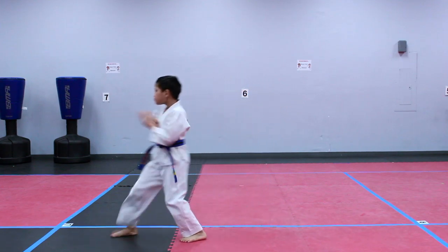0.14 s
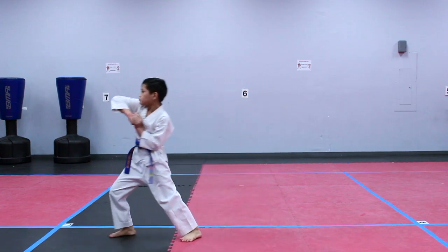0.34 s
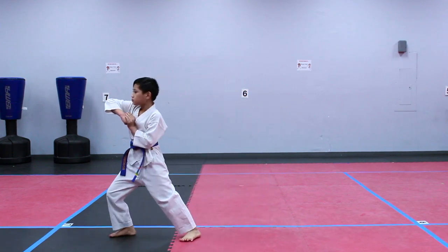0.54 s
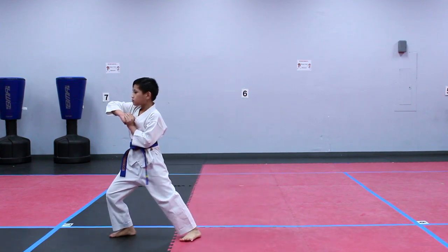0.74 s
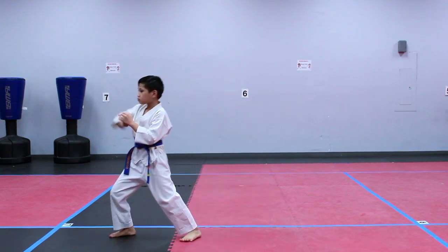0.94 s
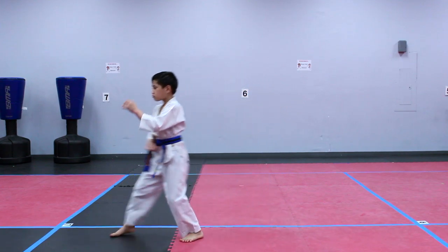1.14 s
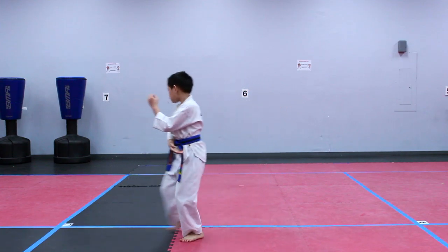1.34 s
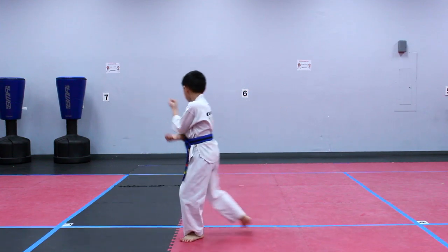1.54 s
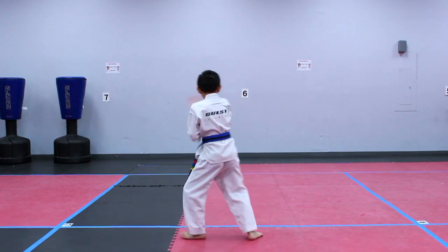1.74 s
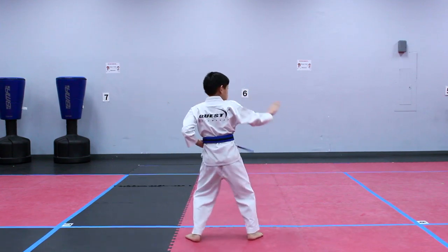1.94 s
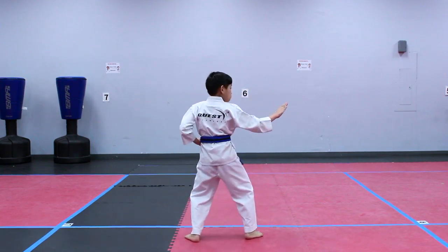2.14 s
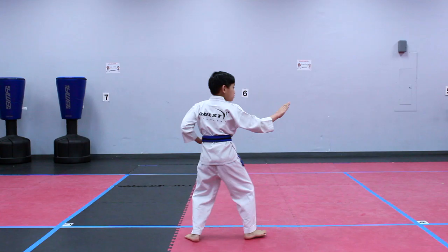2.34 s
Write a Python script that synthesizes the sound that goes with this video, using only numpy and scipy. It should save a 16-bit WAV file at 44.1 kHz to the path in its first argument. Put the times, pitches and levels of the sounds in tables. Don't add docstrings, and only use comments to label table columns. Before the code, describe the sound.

A sharp smack of elbow on palm with a bright cotton snap comes almost at once and rings through a quiet hall; later come faint cloth ticks, a soft barefoot step and slide on a foam mat, heard a few steps away.

```python
import sys
import numpy as np
from scipy import signal
from scipy.fft import rfft, irfft
from scipy.io import wavfile
from scipy.ndimage import uniform_filter1d

SR = 44100
rng = np.random.default_rng(int(sys.argv[2]) if len(sys.argv) > 2 else 0)


def attenuation_scalar(level_db):
    decades = np.asarray(level_db, float) / 20
    return 10 ** decades


def log_audio(samples):
    frames = np.atleast_2d(samples).T
    limited = np.clip(frames, -1, 1)
    pcm = np.round(limited * 32767).astype(np.int16)
    wavfile.write(sys.argv[1], SR, pcm)


N = 105840


def crack(level_db, ring_hz, width_hz, chance):
    edge_db, fizz_db, fizz_s = -3, -16, 0.002
    t = np.arange(len(chance)) / SR
    decay = np.pi * width_hz * t
    ring = -np.e * decay * np.exp(-decay) * np.sin(2 * np.pi * ring_hz * t)
    ring[2] -= attenuation_scalar(edge_db)
    radius = np.exp(-np.pi * width_hz / SR)
    resonance = [1, -2 * radius * np.cos(2 * np.pi * ring_hz / SR), radius ** 2]
    fizz = evened(signal.lfilter([1, 0, -1], resonance, chance))
    return attenuation_scalar(level_db) * (ring + attenuation_scalar(fizz_db) * fizz * np.exp(-t / fizz_s))


# [start_s, level_db (peak), ring_hz, width_hz, near_echo_db]
CLOTH_CRACKS = [(.2058, -32, 5500, 5000, -6), (.2117, -25, 4500, 5000, -6), (.2169, -3, 6600, 2500, 1.5),
                (.2195, -12, 3500, 4000, -6), (.2227, -8, 5000, 2500, -9), (.2253, -12, 7500, 3500, -8),
                (.33, -33, 4800, 1200, -6), (1.1906, -25, 5800, 2000, -6), (1.2323, -38, 7200, 2500, -3),
                (1.2447, -31, 6300, 2500, 4), (1.2456, -33, 3300, 1600, 1.5), (1.27, -35, 7000, 4000, -5),
                (1.2868, -33, 6200, 2000, -6), (1.6913, -38, 6000, 5000, -4),
                (1.6982, -32, 4800, 3000, -.7), (1.7483, -37, 7000, 3500, -4), (1.758, -33, 7000, 2500, -6),
                (2.108, -36, 6800, 3500, 4)]


def cloth_cracks():
    layers = np.zeros((3, 2, N))
    chances = rng.standard_normal((len(CLOTH_CRACKS), 512))
    for k, (start_s, level_db, ring_hz, width_hz, near_echo_db) in enumerate(CLOTH_CRACKS):
        sound = crack(level_db, ring_hz, width_hz, chances[k])
        add_with_echoes(layers[k % 3], start_s - 4 / SR, sound, near_echo_db)
    return layers


def thump(level_db, pitch_hz, cycles):
    t = np.arange(882) / SR - 441 / SR
    swell = np.exp(-(2 * t * pitch_hz / cycles) ** 2)
    push = swell * np.cos(2 * np.pi * pitch_hz * t - 0.5)
    balanced = push - push.mean() * 2 * np.hanning(882)
    return attenuation_scalar(level_db) * balanced


# [start_s (centre), level_db, pitch_hz, cycles]
SLAPS_AND_FOOTFALLS = [(0.2076, -28, 400, 0.58), (.213, -26.5, 296, 0.75), (0.2205, -12.5, 380, 1.04),
                       (0.2176, -18, 436, .8), (.2185, -16.5, 1240, 1.87), (.2245, -19.5, 740, 0.88),
                       (.7, -43, 700, 0.93), (1.1908, -39, 880, 0.8), (1.2465, -37, 522, 1.8),
                       (1.3737, -34.5, 477, 1.06), (1.272, -40.5, 600, 1.5), (1.757, -41, 297, 1.7),
                       (1.4259, -45.5, 500, 1.2), (1.6941, -29, 390, 0.71), (1.697, -46.5, 240, 0.85),
                       (1.7194, -34, 460, 0.71), (2.1087, -44.5, 700, .8)]


def slaps_and_footfalls():
    thuds = np.zeros((2, N))
    for centre_s, level_db, pitch_hz, cycles in SLAPS_AND_FOOTFALLS:
        add_with_echoes(thuds, centre_s - 441 / SR, thump(level_db, pitch_hz, cycles), echo_db=-6)
    return thuds


# [start_s (peak), level_db, rise_s, fall_s]
SWISH_MOVES = [(.03, -63.5, 0.09, 0.16), (.19, -59.5, 0.029, 0.04), (.209, -40, 0.0023, .01),
               (0.226, -24, 0.0037, 0.01), (1.55, -65, 0.15, 0.18), (1.06, -64.5, 0.1, 0.089),
               (1.17, -61, 0.03, 0.036), (1.243, -45.5, 0.012, 0.015), (1.285, -52, .015, 0.016),
               (1.76, -58, 0.027, .03), (1.839, -40, 0.052, 0.036), (2.15, -57.5, 0.043, 0.068),
               (2.35, -56.5, .04, .03)]
# [pitch_hz, level_db (per Hz)]
SWISH_COLOUR = [(290, -46), (500, -0.5), (1300, -2), (2800, -4), (4500, -1.5), (7000, 3.5), (11500, -11.5),
                (15000, -13)]


def swishes():
    slips_per_s, slip_spread_db, slip_share = 5000, 2.5, 0.3
    t = np.arange(N) / SR
    strength = attenuation_scalar(slip_spread_db * np.minimum(rng.exponential(1, N), 5))
    slips = strength * (rng.random(N) < slips_per_s / SR)
    slips = slips * rng.choice([-1., 1.], N)
    hiss = rng.standard_normal(N)
    rub = evened(colour(slip_share * evened(slips) + (1 - slip_share) * hiss, SWISH_COLOUR))
    power = np.zeros(N)
    for peak_s, level_db, rise_s, fall_s in SWISH_MOVES:
        slope_s = np.where(t < peak_s, rise_s, fall_s)
        power += attenuation_scalar(2 * level_db) * np.exp(-2 * abs(t - peak_s) / slope_s)
    return rub * np.sqrt(uniform_filter1d(power, size=80))


# [start_s, first_lag_s, second_lag_s]
NEAR_LAGS = [
    (.22, .007, .0132),
    (1.2, .0077, .0132),
    (1.7, .0068, .0112),
    (2.1, .008, .027),
]


def add_with_echoes(layer, start_s, sound, echo_db):
    when_s, first_s, second_s = np.transpose(NEAR_LAGS)
    arrivals = [(0, 0.00033, 0),  # (row, lag in s, dB)
                (1, np.interp(start_s, when_s, first_s), -4 + echo_db),
                (1, np.interp(start_s, when_s, second_s), -10 + echo_db)]
    for row, lag_s, level_db in arrivals:
        part = layer[row, round((start_s + lag_s) * SR):][:len(sound)]
        part += attenuation_scalar(level_db) * sound[:len(part)]


# [pitch_hz, t60_s]
HALL_T60 = [(80, 1.03), (180, 1.11), (350, 0.45), (700, .55), (2000, 0.7), (5000, 0.64), (11000, 0.55),
            (15000, 0.3)]
# [pitch_hz, level_db]
HALL_COLOUR = [(80, 9), (200, 2), (500, 2.7), (1500, 3.5), (4000, -1), (6500, -2.9), (9000, -4),
               (14000, -1.5)]


def hall(x):
    flutter_db, start_s = 2.5, 0.0067
    taps = np.zeros(SR)
    at = np.arange(0, SR - 20, 20) + rng.integers(0, 20, SR // 20 - 1)
    lumps = evened(uniform_filter1d(rng.standard_normal(len(at)), size=8))
    taps[at] = rng.choice([-1., 1.], len(at)) * attenuation_scalar(flutter_db * lumps)
    hz, t, bands = signal.stft(taps, SR, nperseg=512)
    decay_db = -60 * t / read(HALL_T60, hz)[:, None]
    bands = bands * attenuation_scalar(decay_db + read(HALL_COLOUR, hz)[:, None])
    tail = signal.istft(bands, SR, nperseg=512)[1]
    tail = tail * np.clip(np.arange(len(tail)) / SR / start_s - 0.5, 0, 1)
    return signal.fftconvolve(x, tail / np.linalg.norm(tail))[:N]


# [pitch_hz, level_db (per Hz)]
AIR_COLOUR = [(12, -30), (25, -1.5), (190, -4.5), (600, -9.5), (2650, -14.5), (7000, -21), (10000, -30.5),
              (15800, -40.5)]


def air():
    frames, hz = N // 256 + 5, np.fft.rfftfreq(1024, 1 / SR)
    real, imaginary, patches = rng.standard_normal((frames, 513, 3)).T
    patches = uniform_filter1d(patches, size=10, axis=0)
    patches = evened(uniform_filter1d(patches, size=12, axis=1))
    level_db = read(AIR_COLOUR, hz)[:, None] + 0.77 * patches
    bands = (real + 1j * imaginary) * attenuation_scalar(level_db)
    return attenuation_scalar(-52) * evened(signal.istft(bands, nperseg=1024, noverlap=768)[1][:N])


# [pitch_hz, level_db]
MIC_RESPONSE = [(30, -11), (100, 2.5), (9000, 4), (11000, -4.5), (15000, -21), (16500, -40)]


def microphone(x):
    return colour(x, MIC_RESPONSE)


def evened(x):
    return x / np.sqrt(np.mean(x ** 2) + 1e-20)


def read(points, hz):
    point_hz, value = np.transpose(points)
    return np.interp(np.log(hz + 1), np.log(point_hz + 1), value)


def colour(x, points):
    gain = attenuation_scalar(read(points, np.fft.rfftfreq(len(x), 1 / SR)))
    return irfft(rfft(x) * gain, len(x))


def scene():
    ticks, thuds, rub = cloth_cracks(), slaps_and_footfalls(), swishes()
    ringing = sum(hall(attenuation_scalar(-2) * layer[0]) for layer in ticks)
    ringing = ringing + hall(attenuation_scalar(-4.5) * thuds[0] + attenuation_scalar(-6.5) * rub)
    near = ticks.sum((0, 1)) + thuds.sum(0) + rub
    earlier = 1 + attenuation_scalar(-6) * np.exp(-np.arange(N) / SR / 0.15)
    return (microphone(near + ringing) + air() * earlier)[None]


def top_cut(x):
    return signal.sosfilt(signal.butter(12, 15950, fs=SR, output="sos"), x)


def record(dry):
    return top_cut(dry)


dry = scene()
out = record(dry)
log_audio(out)
```